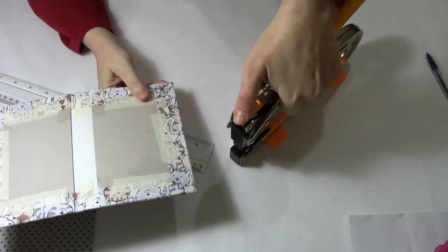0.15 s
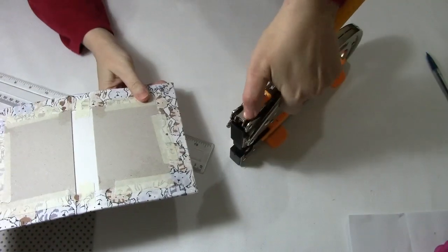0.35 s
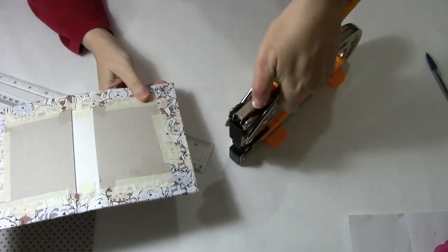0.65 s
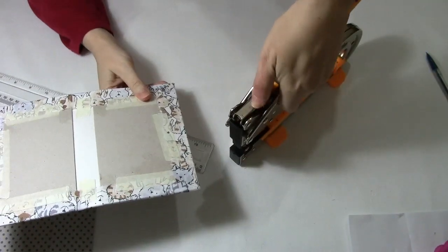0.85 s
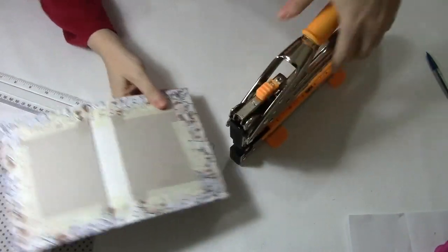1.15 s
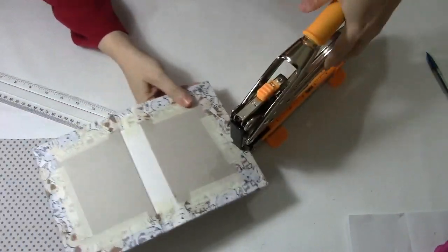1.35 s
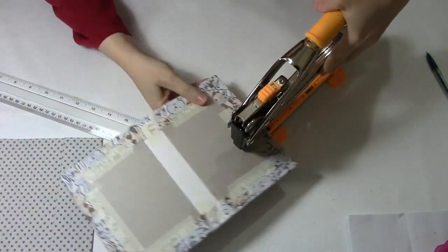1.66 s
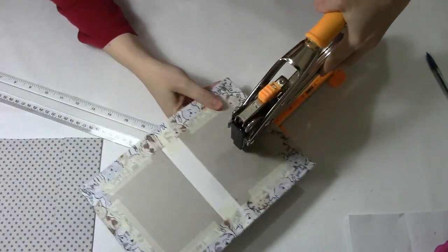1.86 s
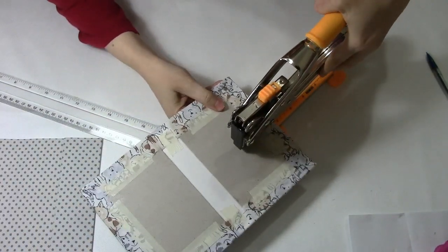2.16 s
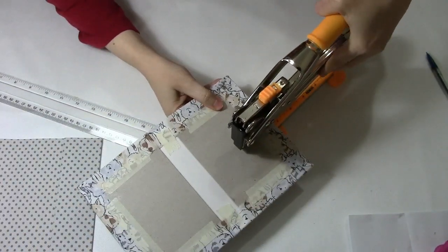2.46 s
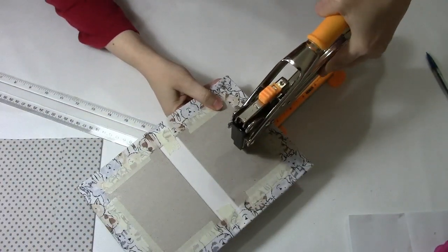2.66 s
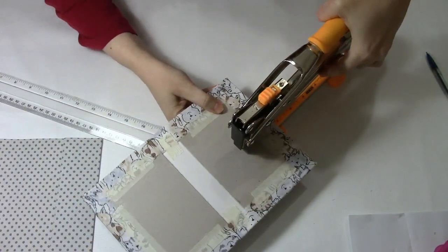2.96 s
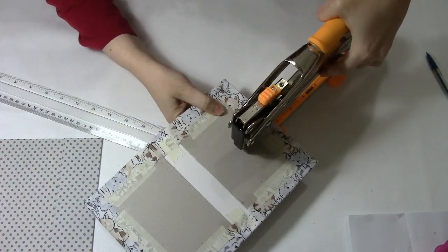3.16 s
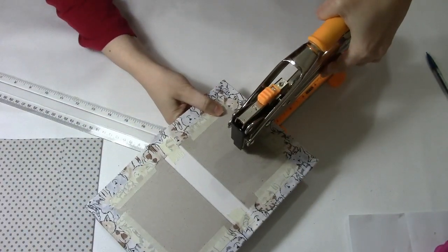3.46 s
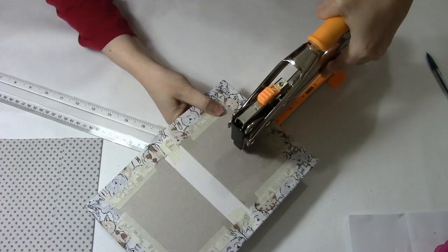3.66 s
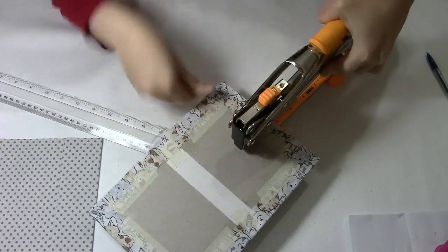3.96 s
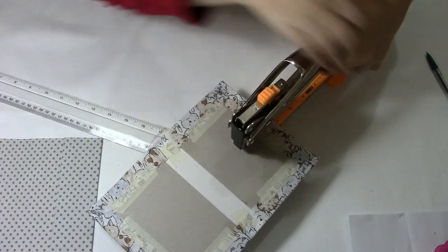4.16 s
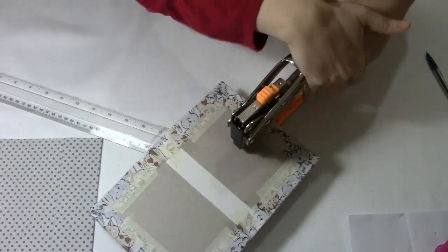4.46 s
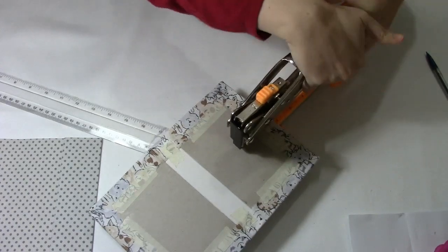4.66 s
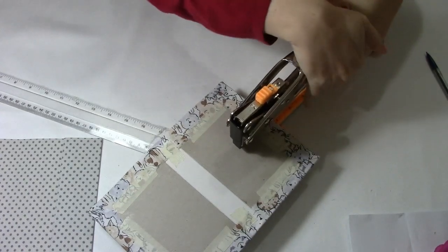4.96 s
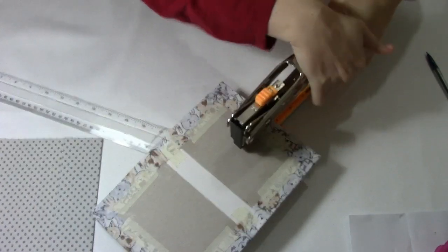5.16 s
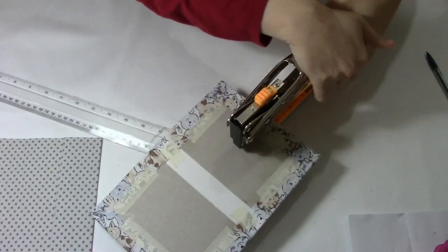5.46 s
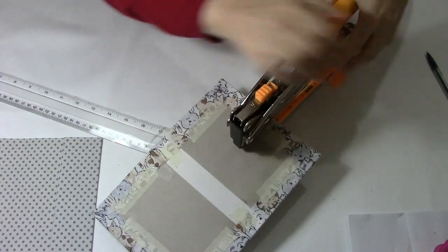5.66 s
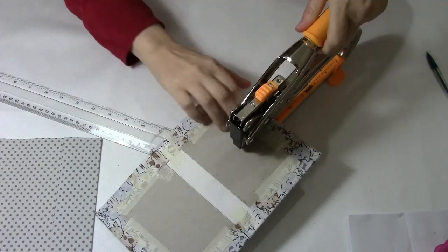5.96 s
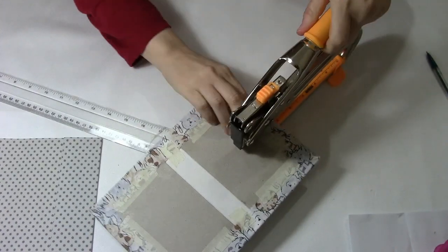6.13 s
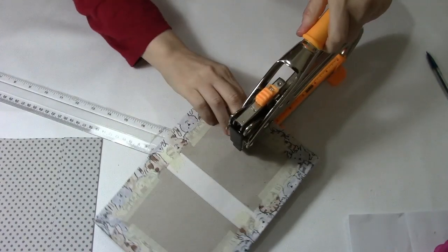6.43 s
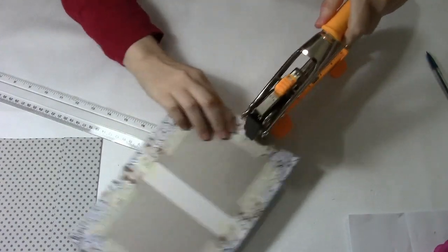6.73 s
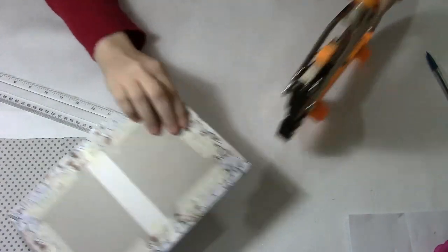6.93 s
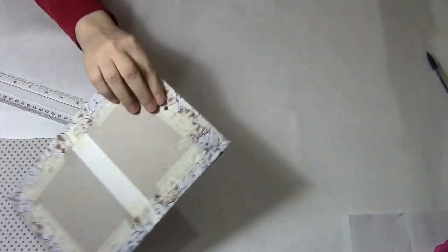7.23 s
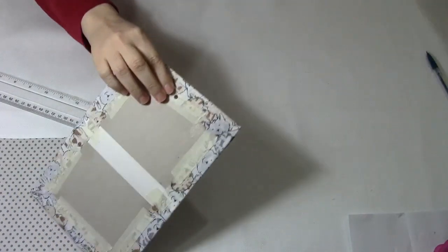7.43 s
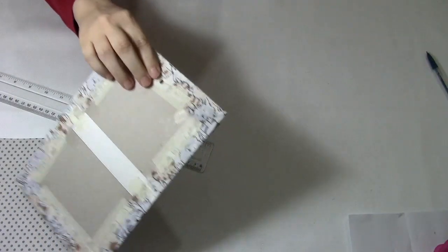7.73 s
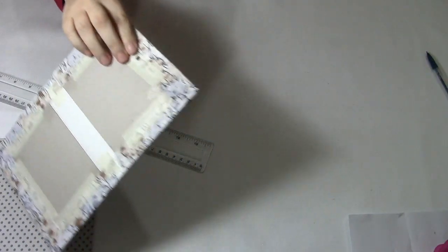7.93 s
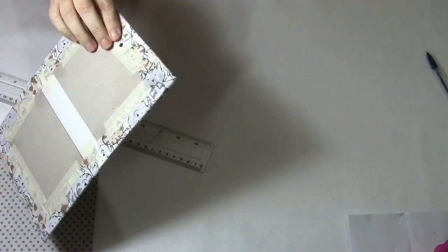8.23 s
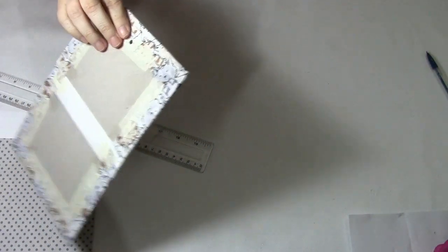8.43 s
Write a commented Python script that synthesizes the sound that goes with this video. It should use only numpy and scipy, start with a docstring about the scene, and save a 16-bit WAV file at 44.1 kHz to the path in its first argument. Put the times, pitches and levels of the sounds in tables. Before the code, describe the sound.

A metal hand punch latch snaps open sharply, card knocks and slides into the jaw, then a crunching clack punches through and squeaks back.

```python
"""A desk in a small room: a lever hole punch is worked on a fabric-covered cardboard cover.
The latch snaps open in bursts of noise over ringing steel modes; the card knocks as a few hollow modes.
Squeezed, it crunches and groans in filtered random slips, until the pin breaks through with a clack.
The lever squeaks back up in gliding overtones; the cover slides out as grainy rub over a moving hollow
tone, then bumps the desk, whose low modes boom. Hands brush and lean, over a soft hiss."""
import sys
import numpy as np
from scipy import signal
from scipy.fft import rfft, irfft
from scipy.io import wavfile

SR = 44100
rng = np.random.default_rng(int(sys.argv[2]) if len(sys.argv) > 2 else 0)


def put_to_file(sound):
    """Save the sound as 16-bit audio at rate SR, in the file named by the first command-line argument."""
    columns = np.atleast_2d(sound).T  # one column per channel
    safe = np.clip(columns, -1, 1)
    whole_steps = np.round(safe * 32767)
    wavfile.write(sys.argv[1], SR, whole_steps.astype(np.int16))


N = 378819

# Levels of clicks, knocks and thuds are relative: a trim in their functions still applies.
# steel parts click: t/s, level/dB, ring t60/s, treble tilt/(dB per octave)
STEEL_CLICKS = [(0.156, -33.5, .041, -4), (0.317, -34.5, 0.024, -2), (0.349, -22, 0.031, -1),
                (0.3819, -16, 0.063, -1), (0.422, -29, 0.041, -7), (0.45, -40, .028, 5),
                (0.612, -6, 0.049, 0.5), (0.6182, 2.5, 0.033, 2), (0.7, -21, 0.04, -2.5),
                (0.997, -39, 0.03, 1), (1.3835, -13, 0.023, -1.5), (1.5211, -33, 0.06, -8.5),
                (3.176, -29, .045, -10.5), (4.836, -39.5, 0.032, -2.5), (5.036, -16, 0.011, -7),
                (5.047, -26.5, 0.058, 3), (5.2055, -11, 0.025, 0), (5.215, -5.5, 0.013, 9),
                (5.237, -13.5, 0.052, -4), (5.3008, -16, 0.062, -7), (5.524, -19, 0.024, -6.5),
                (5.589, -21.5, 0.021, -2), (5.732, -34, 0.029, -6), (5.763, -42, .03, 4),
                (5.866, -34, 0.061, 3), (6.176, -27.5, 0.045, -3), (6.335, -41.5, .025, -9),
                (6.385, -37.5, 0.019, -6.5), (7.092, -31, 0.029, -2.5), (7.39, -39, 0.044, -3),
                (7.57, -41.5, 0.041, -6.5), (7.728, -40.5, 0.059, -5), (7.825, -37.5, .032, 0.5),
                (8.426, -41.5, 0.049, 1), (8.564, -36, 0.091, -4.5)]
# hollow knocks of card and jaw, higher when clamped: t/s, level/dB, pitch ratio
CARD_KNOCKS = [(1.055, -43.5, 1.07), (1.384, -9.5, 1.009), (1.517, -16.5, 1.006), (3.177, -30.5, 1.12),
               (3.994, -30.5, 1.03), (4.002, -21.5, 1.36), (4.982, -28.5, 1.076), (5.036, -14.5, 1.1),
               (5.2065, 0.5, 1.16), (5.591, -21, 1.04), (5.732, -27.5, 1.18), (6.174, -26, 1.12),
               (6.384, -42, 1.2), (7.091, -39.5, 1.33), (7.39, -39.5, 1.016), (7.729, -43.5, 1.5),
               (8.471, -40.5, 0.73)]
# blows that reach the desk: t/s, level/dB, contact time/ms
DESK_THUDS = [(0.351, -36, 4.6), (0.618, -26, 2.5), (0.655, -26.5, 2.4), (1.386, -32.5, 2),
              (3.178, -34, 2.6), (3.849, -45, 2), (4.046, -35.5, 2), (4.653, -28.5, 1), (4.982, -30.5, 1.7),
              (5.037, -20.5, 2.2), (5.21, -10, 1.7), (5.2193, -0.5, 1.42), (5.238, -22, 2.6),
              (5.2818, -11.5, 2.75), (8.426, -39.5, 2.4), (8.469, -38.5, 0.65), (8.569, -10.5, 3.76)]
# card fibres tear and rasp: t/s, length/s, level/dB, tilt/(dB per octave)
FIBRE_CRUNCHES = [(3.944, 0.07, -54.5, 1), (3.991, 0.013, -36.5, -1), (4.013, 0.013, -36.5, 0),
                  (4.691, 0.12, -62, -1), (4.972, 0.08, -45, -3), (5.034, 0.028, -32, -3.5),
                  (5.196, 0.0065, -43, -4.5), (5.2047, 0.0039, -14.5, -2), (5.228, 0.0473, -29, 0),
                  (5.282, 0.029, -27.5, -0.5), (5.504, 0.18, -44, -1), (5.847, 0.031, -43.5, -1),
                  (8.469, 0.02, -47, -4)]
# the loaded card and grip groan: t/s, length/s, level/dB
CARD_GROANS = [(3.846, 0.029, -36), (3.887, 0.076, -46), (4.04, 0.018, -46), (4.644, 0.042, -45.5),
               (4.727, 0.074, -48.5), (4.974, 0.056, -42), (5.04, 0.053, -38), (5.22, 0.0094, -17),
               (5.243, 0.051, -29), (5.854, 0.015, -44.5)]
# dry steel sticks and slips: t/s, length/s, first f/Hz, last f/Hz, level/dB,
# overtone step/(dB per octave), pitch unsteadiness (rms share of f)
LEVER_SQUEAKS = [(3.677, 0.083, 5190, 5090, -53, -43.5, 0.0031),
                 (4.823, 0.027, 1684, 1640, -49.5, -24, 0.0046),
                 (4.826, 0.019, 5020, 4820, -48, -10, 0.018), (5.043, 0.0525, 5620, 5530, -47, -22, 0.0104),
                 (5.07, 0.028, 4600, 4590, -35, -18, 0.014), (5.514, 0.0046, 5330, 4980, -21, -16, 0.02),
                 (5.549, 0.0303, 7560, 7020, -31.5, -9.5, 0.068),
                 (5.654, 0.0097, 1642, 1556, -30, -4.5, 0.019), (5.66, 0.026, 1570, 1470, -36, -5, 0.021),
                 (5.858, 0.029, 7570, 7220, -44.5, -13, 0.0128)]
# card slides over desk and jaw, and the hollow under it sings: t/s, speeding up/s, slowing down/s,
# rub level/dB, rub tilt/(dB per octave), hollow level/dB, first f/Hz, last f/Hz
CARD_SLIDES = [(1.62, .22, 0.16, -47, 1, -59, 820, 788), (1.93, 0.026, 0.16, -55.5, -1, -68.5, 800, 797),
               (2.18, 0.086, .11, -57, 0, -67.5, 800, 798), (5.842, 0.035, 0.033, -46, 1, -38, 900, 806),
               (5.988, .1, 0.077, -41, 1, -48.5, 1080, 911), (6.22, 0.072, 0.062, -50, 0, -60, 1000, 1008),
               (6.48, .18, .22, -45.5, -0.5, -53.5, 950, 808.5),
               (6.78, 0.073, 0.058, -57, 0.5, -53, 770, 829)]
# skin brushes over grip and fabric: t/s, speeding up/s, slowing down/s, level/dB
SKIN_BRUSHES = [(0.96, 0.037, 0.07, -57), (4.28, 0.028, 0.026, -57), (4.35, 0.13, 0.031, -53.5),
                (4.62, 0.056, 0.2, -55.5), (7.45, 0.039, 0.047, -60.5), (7.82, 0.12, 0.23, -48),
                (8.145, 0.022, 0.066, -53)]
# the hands shift their weight and stir the desk: t/s, pressing/s, easing/s, level/dB
HAND_LEANS = [(0.0, 0.04, 0.55, -55.5), (0.62, 0.093, .42, -47.5), (2.0, 0.31, .7, -54),
              (4.03, 0.048, .15, -51), (4.25, 0.044, .08, -47), (4.39, 0.055, .11, -45),
              (4.62, 0.14, .23, -56.5), (5.47, 0.13, .16, -40), (5.8, 0.099, .2, -51.5)]

# ringing modes of the desk top: f/Hz, level/dB, t60/s
DESK_MODES = [(62, -27, .15), (114.9, -5, 0.31), (149, -4.5, 0.25), (206, 4.5, 0.018), (216, -11, 0.11),
              (264.9, -11, 0.25), (365, 1, 0.017), (440.6, -1.5, 0.052)]
# ringing modes of the card in the jaw at pitch ratio 1: f/Hz, level/dB, t60/s
JAW_MODES = [(753, -0.5, 0.0416), (817.4, 0.5, 0.029), (1058, -10.5, 0.034), (2430, -19, 0.019),
             (3300, -30, 0.023)]
# ringing modes of the steel frame: f/Hz, level/dB, t60/s
FRAME_MODES = [(2580, 1.5, .2), (2800, -2.5, 0.14), (3130, -6.5, .2), (4130, -2.5, 0.2), (7050, 3, .18),
               (7420, 4, .25), (7600, -8, 0.35), (8400, -5, .16), (9900, -12.5, .2), (11358, -12, .16)]

# Spectra of the noisy sounds; only their shape counts, the overall power is levelled out.
# steel crack: f/Hz, level/dB (per Hz)
CRACK_SPECTRUM = [(200, -15.5), (1000, -12.5), (1800, -8), (2400, 6), (3400, 1.5), (4500, 0), (5600, -3),
                  (8300, -2), (10500, -6), (13000, -12), (16000, -16)]
# tearing fibres: f/Hz, level/dB (per Hz)
CRUNCH_SPECTRUM = [(150, -2.5), (600, -3), (1050, 9), (1550, 0), (2200, 3.5), (2650, 0.5), (3300, 1),
                   (4500, -8.5), (7000, -9), (10000, -11.5), (15500, -22.5)]
# groaning stack: f/Hz, level/dB (per Hz)
GROAN_SPECTRUM = [(30, -29.5), (90, -4), (180, 3), (420, 7), (600, -4.5), (1100, -10), (1700, -26),
                  (5000, -52.5), (16000, -63.5)]
# rubbing card: f/Hz, level/dB (per Hz)
RUB_SPECTRUM = [(200, -43), (500, -19.5), (800, 0), (1100, -0.5), (1530, -9.5), (2350, 3.5), (3300, -1),
                (4000, -7), (5100, -9.5), (9200, -13.5), (14000, -23), (16000, -30)]
# brushing skin: f/Hz, level/dB (per Hz)
BRUSH_SPECTRUM = [(350, -24), (600, 1.5), (727, -3), (812, 2), (894, -2), (2830, 3), (7830, -1),
                  (14500, -5.5), (16000, -22)]
# desk murmur under the hands: f/Hz, level/dB (per Hz)
MURMUR_SPECTRUM = [(30, -15), (80, -7), (108, 1.5), (125, -10.5), (148, 3), (180, -11), (300, -15.5),
                   (600, -22.5), (2000, -44.5), (16000, -73)]
# hiss common to both channels: f/Hz, level/dB (per Hz)
MID_HISS_SPECTRUM = [(15, -34.5), (25, -1.5), (53, 1.5), (102, -6), (141, 1), (195, -5), (659, -10),
                     (818, -11), (1260, -13), (1400, -10), (1940, -14.5), (2760, -15.5), (9840, -23.5),
                     (14400, -28), (16000, -31)]
# hiss that differs between the channels: f/Hz, level/dB (per Hz)
SIDE_HISS_SPECTRUM = [(15, -56), (25, -19), (59, -19.5), (94, -7), (200, -2), (354, -2.5), (677, -8),
                      (14400, -30.5), (16000, -32)]
# where the reverberation differs most between the microphones: f/Hz, level/dB
REVERB_SPREAD = [(60, -21.5), (250, -18.5), (1000, -0.5), (4000, 1), (8000, 7), (16000, 1.5)]

# decay of the room: f/Hz, t60/s
REVERB_T60 = [(100, 0.6), (500, 0.457), (3000, 0.36), (7000, 0.39), (12000, 0.22)]
# strength of the reverberation: f/Hz, level/dB
REVERB_LEVEL = [(100, -6.5), (500, -11), (1000, -8.5), (3000, -10), (8000, -9), (15000, -18.5)]

MID_HISS_DB, SIDE_HISS_DB = -57.5, -59.5
CUTOFF_HZ = 15900  # no squeak overtone starts above this
BUILD_UP_SHARE = 0.059  # a click swells for this share of its ring: more rattling parts, later peak
FULL_RATTLE_S = 0.05  # a click that rings this long drives the frame fully, a shorter one less
FRAME_DB = -41  # the frame's ring under the crack
# rise in level from first grip to full speed; the hollow follows speed much less than the rub
SLIDE_SWELL_DB, HOLLOW_SWELL_DB, BRUSH_SWELL_DB, LEAN_SWELL_DB = 14, 3, 10.5, 13.5
SWELL_SHAPE = 1.1  # roundness of every hand movement's peak (1 = pointed)
GRIP_S, LET_GO_S = 0.006, 0.035  # friction sets in quickly and ends more softly
DIP_S, DIP_LENGTH_S, DIP_EDGE_S, DIP_DB = 2.733, 0.023, 0.0083, -33  # the level dips briefly


def from_db(db):
    """Decibels to gain."""
    return 10 ** (np.asarray(db) / 20)


def rms_one(x):
    """Scale to rms 1."""
    return x / np.sqrt(np.mean(x ** 2) + 1e-20)


def at_hz(points, hz):
    """Read a table on a log-frequency axis."""
    f, value = np.transpose(points)
    return np.interp(np.log(np.maximum(hz, 1)), np.log(f), value)


def seconds(length):
    """Time axis of a given length."""
    return np.arange(int(length * SR)) / SR


def add(out, s, sound):
    """Mix a sound in at a given time."""
    i = int(s * SR)
    out[i:i + len(sound)] += sound[:len(out) - i]


def coloured(x, spectrum, tilt=0, size=1024):
    """Causal (minimum-phase) filter with this spectrum and unit power gain."""
    hz = np.fft.rfftfreq(size, 1 / SR)
    level_db = at_hz(spectrum, hz) + tilt * np.log2(np.maximum(hz, 500))
    cepstrum = irfft(np.log(from_db(level_db)))
    # folding the cepstrum forward makes the response start at once
    cepstrum[1:size // 2] *= 2
    cepstrum[size // 2 + 1:] = 0
    response = irfft(np.exp(rfft(cepstrum)))
    return signal.fftconvolve(x, response / np.linalg.norm(response))[:len(x)]


def ring(modes, t, scatter_db):
    """Free ringing of a body; every blow shares its force differently among the modes."""
    total = 0
    for hz, db, t60 in modes:
        level_db = db + scatter_db * rng.normal() - 60 * t / t60
        total = total + from_db(level_db) * np.sin(2 * np.pi * hz * t)
    return total


def grains(count, per_s, spread_db):
    """Random tiny slips of uneven size; rms 1."""
    sizes = from_db(spread_db * np.minimum(rng.exponential(1, count), 4))
    signed = sizes * rng.choice([-1, 1], count)
    return rms_one(signed * (rng.random(count) < per_s / SR))


def wander(count, rate_hz):
    """Random motion, mostly slower than a given rate; rms 1."""
    lowpass = signal.butter(2, rate_hz, fs=SR, output="sos")
    return rms_one(signal.sosfilt(lowpass, rng.standard_normal(count)))


def stroke(t, length, rise, fall):
    """A push that builds up, holds and lets go."""
    return (1 - np.exp(-t / rise)) * np.exp(-np.maximum(t - length, 0) / fall)


def movement(t, rise, fall, swell_db):
    """A hand grips, speeds up, slows down and lets go; friction is loudest at full speed."""
    from_peak = np.maximum((rise - t) / rise, (t - rise) / fall)
    contact = np.clip(np.minimum(t / GRIP_S, (rise + fall - t) / LET_GO_S), 0, 1)
    return contact * from_db(-swell_db * from_peak ** SWELL_SHAPE)


def hiss(spectrum):
    """A steady bed of shaped noise."""
    return coloured(rng.standard_normal(N), spectrum, size=8192)


def handling():
    """Fine-grained friction of skin, and the desk's murmur under the hands."""
    out = np.zeros(N)
    for s, rise, fall, db in SKIN_BRUSHES:
        t = seconds(rise + fall)
        brush = coloured(grains(len(t), per_s=7700, spread_db=4.0), BRUSH_SPECTRUM)
        add(out, s, from_db(db) * brush * movement(t, rise, fall, BRUSH_SWELL_DB))
    for s, rise, fall, db in HAND_LEANS:
        t = seconds(rise + fall)
        murmur = rms_one(coloured(rng.standard_normal(len(t)), MURMUR_SPECTRUM, size=8192))
        add(out, s, from_db(db) * murmur * movement(t, rise, fall, LEAN_SWELL_DB))
    return out


def room(x, build_up_s=0.0053):
    """Wall echoes thicken, then die away at a rate of their own in each of eight bands."""
    t, response = seconds(0.7), 0
    edges = np.geomspace(60, 17000, 9)
    for low, high in zip(edges, edges[1:]):
        hz = np.sqrt(low * high)
        decay = np.exp(-np.log(1000) * t / at_hz(REVERB_T60, hz))
        fade = (1 - np.exp(-(t / build_up_s) ** 2)) * decay
        echoes = rng.standard_normal(len(t)) * fade / np.linalg.norm(fade)
        band = signal.butter(2, [low, high], "band", fs=SR, output="sos")
        response = response + from_db(at_hz(REVERB_LEVEL, hz)) * signal.sosfilt(band, echoes)
    return signal.fftconvolve(x, response)[:N]


def clicks(trim_db=-4.0):
    """Steel on steel: a noisy crack of crowded short modes, with a faint ring of the frame."""
    out, t = np.zeros(N), seconds(0.25)
    for s, db, t60, tilt in STEEL_CLICKS:
        onset = 1 - np.exp(-(t / (BUILD_UP_SHARE * t60)) ** 2)
        decay = np.exp(-np.log(1000) * t / max(t60, 0.004))
        crack = coloured(rng.standard_normal(len(t)) * onset * decay, CRACK_SPECTRUM, tilt)
        drive = from_db(FRAME_DB) * min(t60 / FULL_RATTLE_S, 1)
        frame = drive * onset * ring(FRAME_MODES, t, scatter_db=1.5)
        add(out, s, from_db(db + trim_db) * (crack + frame))
    return out


def thuds(trim_db=-7.0, lowest_hz=50):
    """The desk top booms; longer contact leaves out upper modes, and the deepest bass is not radiated."""
    out, t = np.zeros(N), seconds(0.5)
    for s, db, contact_ms in DESK_THUDS:
        force = np.sin(np.pi * np.minimum(1000 * t / max(contact_ms, 0.2), 1)) ** 2
        modes = ring(DESK_MODES, t, scatter_db=3.4)
        boom = signal.fftconvolve(modes, force / force.sum())[:len(t)]
        add(out, s, -from_db(db + trim_db) * boom)
    return signal.sosfilt(signal.butter(2, lowest_hz, "high", fs=SR, output="sos"), out)


def knocks(trim_db=-1.5, rise_s=0.0021):
    """The card, held in the jaw, rings briefly and hollowly."""
    out, t = np.zeros(N), seconds(0.2)
    onset = 1 - np.exp(-(t / rise_s) ** 2)
    for s, db, ratio in CARD_KNOCKS:
        # a higher pitch ratio also shortens the ring
        knock = ring(JAW_MODES, t * ratio, scatter_db=1.5) * onset
        add(out, s, from_db(db + trim_db) * knock)
    return out


def hollow(hz, half_width_hz=75):
    """Friction excites the air under the card, whose pitch moves as the gap changes; rms 1."""
    phase = 2 * np.pi * np.cumsum(hz) / SR
    cosine_part = wander(len(hz), half_width_hz) * np.cos(phase)
    sine_part = wander(len(hz), half_width_hz) * np.sin(phase)
    return rms_one(cosine_part + sine_part)


def slides(catch_db=1.0):
    """The card rubs in fine grains that catch unevenly, over the tone of the hollow beneath it."""
    out = np.zeros(N)
    for s, rise, fall, rub_db, tilt, hollow_db, first_hz, last_hz in CARD_SLIDES:
        t = seconds(rise + fall)
        catches = from_db(catch_db * wander(len(t), rate_hz=30))
        slips = grains(len(t), per_s=3500, spread_db=2.5) * catches
        rub = coloured(slips, RUB_SPECTRUM, tilt) * movement(t, rise, fall, SLIDE_SWELL_DB)
        glide_hz = np.linspace(first_hz, last_hz, len(t))
        tone = hollow(glide_hz) * movement(t, rise, fall, HOLLOW_SWELL_DB)
        add(out, s, from_db(rub_db) * rub + from_db(hollow_db) * tone)
    return out


def squeaks(pivot_hz=3100, pivot_width_hz=450, pivot_db=9.5):
    """Stick-slip tones sag as the lever slows; a resonance of the lever lifts the overtones near it."""
    out, t = np.zeros(N), seconds(0.2)
    for s, length, first_hz, last_hz, db, step_db, unsteady in LEVER_SQUEAKS:
        glide_hz = np.interp(t, [0, length], [first_hz, last_hz])
        hz = glide_hz * (1 + unsteady * wander(len(t), rate_hz=670))
        phase = 2 * np.pi * np.cumsum(hz) / SR
        orders = np.arange(1, int(CUTOFF_HZ / first_hz) + 1)[:, None]
        lift_db = pivot_db / (1 + ((orders * hz - pivot_hz) / pivot_width_hz) ** 2)
        overtones = from_db(step_db * np.log2(orders) + lift_db) * np.sin(orders * phase)
        tone = np.sum(overtones, axis=0)
        add(out, s, from_db(db) * tone * stroke(t, length, rise=length / 3, fall=0.003))
    return out


def cardboard(clump_db=1.0):
    """Fibres snap in clumps, ply after ply, under the pin; sparser slips make the stack groan."""
    out, t = np.zeros(N), seconds(0.2)
    for s, length, db, tilt in FIBRE_CRUNCHES:
        plies = from_db(clump_db * wander(len(t), rate_hz=85))
        push = stroke(t, length, rise=0.0011, fall=0.015)
        snaps = grains(len(t), per_s=9000, spread_db=1.5) * plies * push
        add(out, s, from_db(db) * coloured(snaps, CRUNCH_SPECTRUM, tilt))
    for s, length, db in CARD_GROANS:
        push = stroke(t, length, rise=0.0017, fall=0.00956)
        slips = grains(len(t), per_s=900, spread_db=1.5) * push
        add(out, s, from_db(db) * coloured(slips, GROAN_SPECTRUM))
    return out


def scene():
    """Two close microphones share the direct sound; the room and the hiss differ between them."""
    knocking, squeaking = knocks(), squeaks()
    rest = handling() + clicks() + thuds() + slides() + cardboard()
    # knocks send less into the room, squeaks slightly more
    room_send = rest + from_db(-6.0) * knocking + from_db(1.0) * squeaking
    direct = rest + knocking + squeaking
    mid = direct + room(room_send) + from_db(MID_HISS_DB) * hiss(MID_HISS_SPECTRUM)
    side_room = from_db(-14.0) * room(coloured(room_send, REVERB_SPREAD))
    side = side_room + from_db(SIDE_HISS_DB) * hiss(SIDE_HISS_SPECTRUM)
    return np.array([mid + side, mid - side])


def record(dry):
    """The level dips once, the highest peaks are rounded and the top is cut."""
    outside = np.abs(np.arange(N) / SR - DIP_S) - DIP_LENGTH_S / 2
    dip = from_db(DIP_DB * np.clip(1 - outside / DIP_EDGE_S, 0, 1))
    rounded = 1.1 * np.tanh(dip * dry / 1.1)
    # 60 dB down from 900 Hz above the cutoff
    top_cut = signal.cheby2(14, 60, CUTOFF_HZ + 900, fs=SR, output="sos")
    return signal.sosfilt(top_cut, rounded)


dry = scene()
out = record(dry)
put_to_file(out)
```